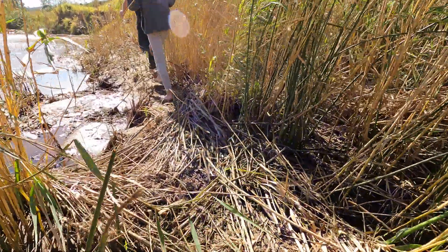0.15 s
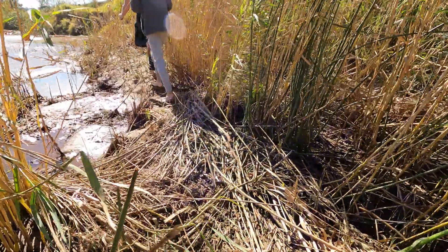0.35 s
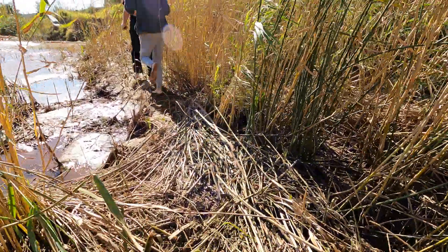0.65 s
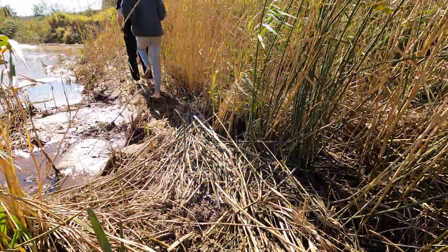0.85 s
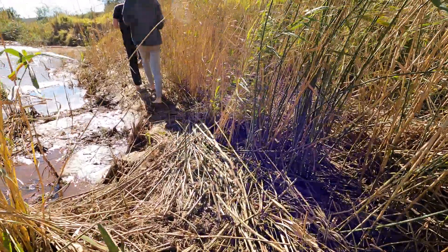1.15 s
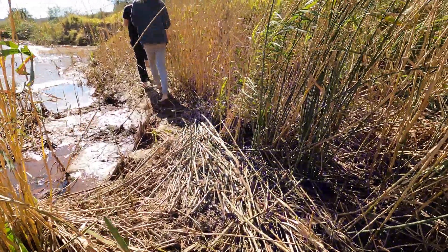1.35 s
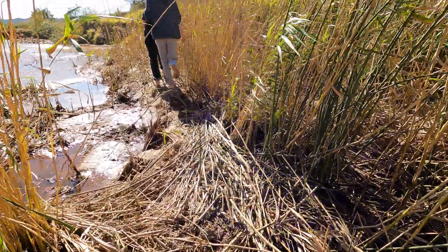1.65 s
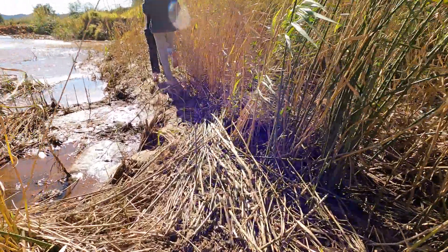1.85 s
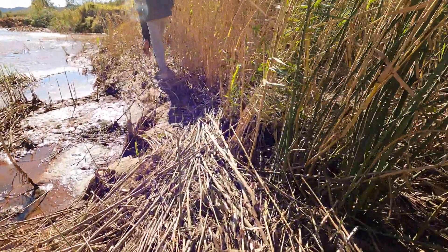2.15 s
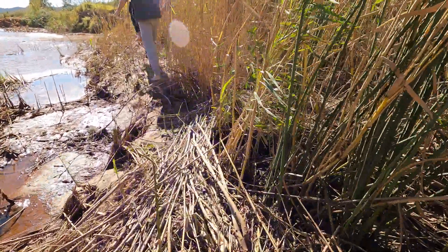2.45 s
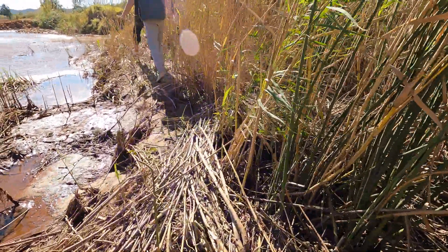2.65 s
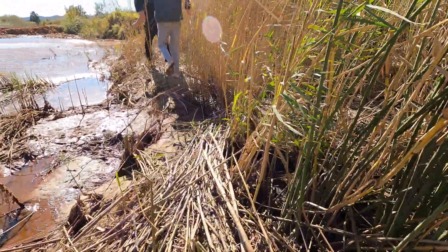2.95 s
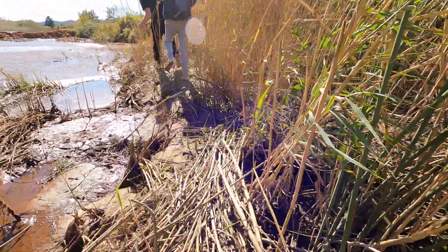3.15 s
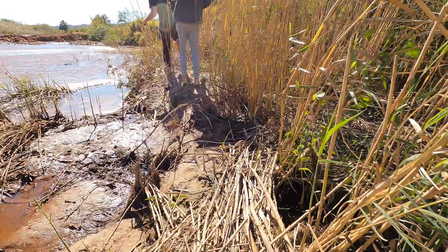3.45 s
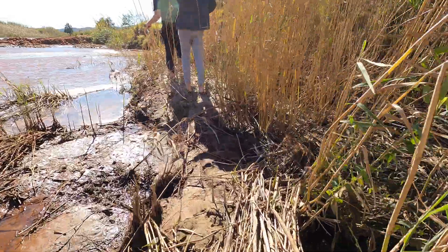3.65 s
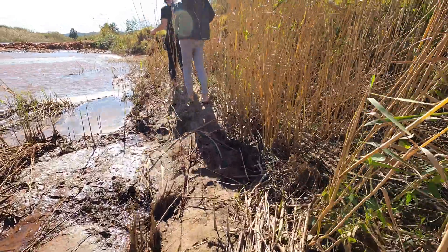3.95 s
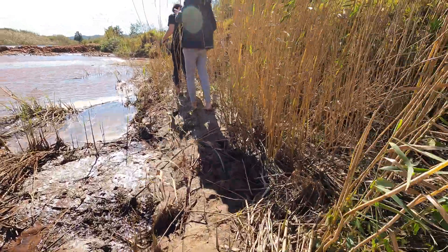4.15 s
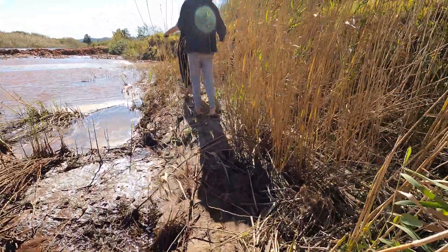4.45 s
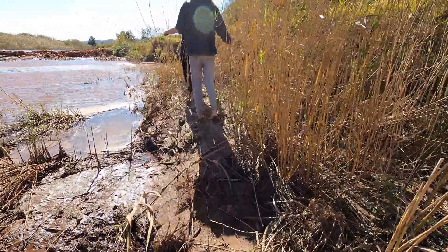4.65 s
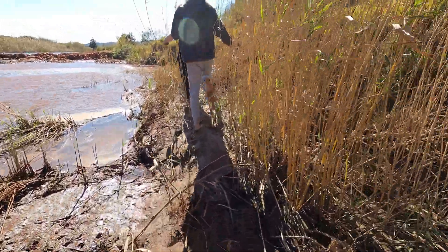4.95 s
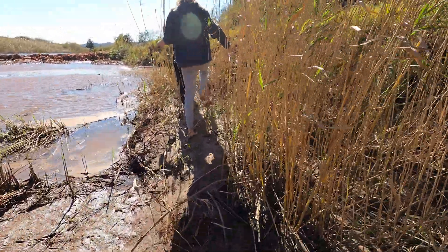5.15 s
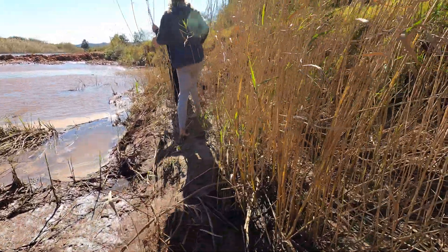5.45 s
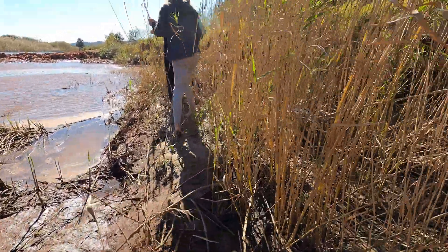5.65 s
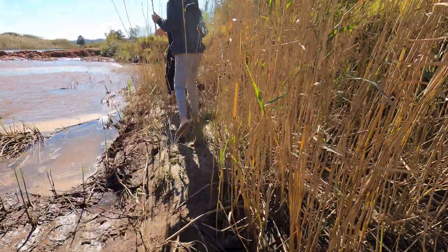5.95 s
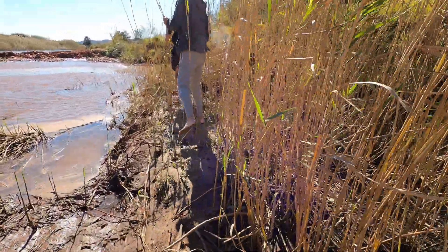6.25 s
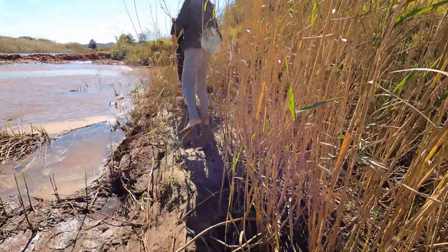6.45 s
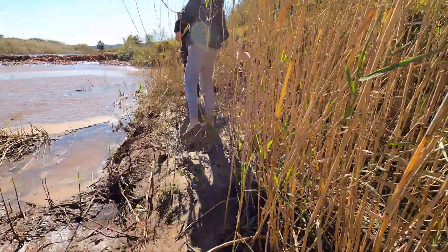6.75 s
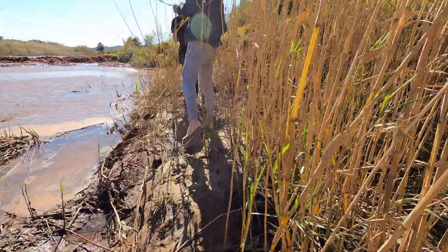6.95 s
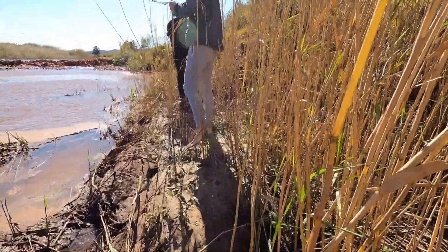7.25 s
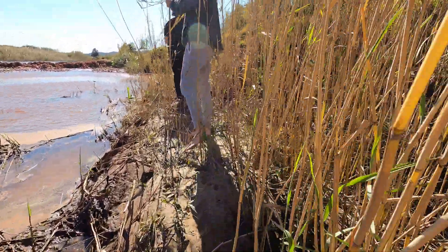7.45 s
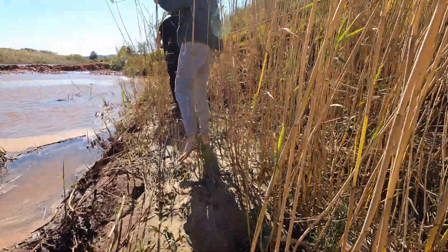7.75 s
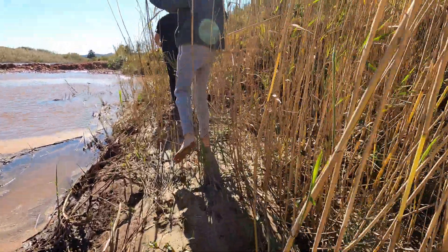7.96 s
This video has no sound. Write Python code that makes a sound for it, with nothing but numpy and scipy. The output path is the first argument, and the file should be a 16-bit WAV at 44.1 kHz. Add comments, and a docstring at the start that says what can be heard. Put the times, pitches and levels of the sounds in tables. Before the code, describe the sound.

Outdoors on a riverbank, close in stereo, walkers push through dry reeds. From 0 s the rustle is full and crisp, thousands of fine leafy ticks over a hiss, with rapid bright stem snaps and faint dull footfalls. It turns softer and duller after 1 s, nearly dropping away at 1.2-1.5 s. Brushing returns at 1.7 s, with a hard crack at 2.3 s among crunching stems and further sharp snaps near 2.9 s. Around 3.1-3.4 s it is sparse and muffled, then a dense crackling burst comes at 3.9-4.2 s. It thins from 4.4 to 5.2 s with isolated ticks. At 5.5 s a very sharp crack opens the loudest stretch, heavy rustling and many breaking stems until 6.1 s. The busy opening rustle and snaps then return, fading toward quiet by 7.4 s and rising again near 8 s. Faint low wind and water hum underneath.

```python
"""A riverbank thick with dry reeds, heard close as walkers push through.
Leaves rustle as thousands of tiny noise ticks over a hiss, with short scrapes where stalks touch.
Stems snap as band-passed jerks with a splintering tail; feet thud as a dull knock and a ringing sine.
Wind and river hum low behind them, as drifting bands of noise.
One microphone is spread to two channels; the passage of about six seconds plays round again."""
import sys
import numpy as np
from scipy import signal
from scipy.io import wavfile
from scipy.ndimage import uniform_filter1d

SR = 44100
rng = np.random.default_rng(int(sys.argv[2]) if len(sys.argv) > 2 else 0)


def master_out(mix):
    """Clip the mix to full scale and print it as 16-bit PCM to the path in sys.argv[1]."""
    frames = np.transpose(np.atleast_2d(mix))
    ceiling = np.clip(frames, -1, 1)
    pcm = np.round(ceiling * 32767).astype(np.int16)
    wavfile.write(sys.argv[1], SR, pcm)


N = 356769
PASSAGE = 270751   # samples until the passage starts over

# bodies pushing through the reeds, a curve: time_s, push_db (before the leaf and crackle gains),
# treble_db (lift or cut, in full from 12 kHz)
BRUSHING = [(0.0, -31, 0.5), (0.13, -32.5, 3), (0.33, -42.5, -0.5), (0.53, -40.5, -1.5), (0.71, -40, -1),
            (0.86, -36, -3), (0.98, -44, -6), (1.08, -40, -10), (1.16, -43, -11), (1.21, -52, -6),
            (1.44, -58, -5), (1.53, -47, -3), (1.62, -44.5, -0.5), (1.74, -36, -3.5), (1.92, -36.5, 2),
            (2.08, -33.5, -3.5), (2.26, -36.5, -2), (2.5, -42, -0.5), (3.11, -44.5, -9), (3.41, -37.5, -12),
            (3.85, -33.5, 0), (4.2, -35, 1), (4.28, -41.5, -2), (4.59, -49, 2), (4.76, -39.5, 1),
            (5.14, -41.5, -6.5), (5.25, -36, -7.5), (5.53, -32.5, -4.5), (5.73, -28.5, -0.5),
            (6.14, -33.5, 2.5)]
# bunches of stems crushed at once, each a brief swell of the rustle: peak_time_s, push_db
CRUNCHES = [(0.49, -37.5), (2.30, -36), (2.416, -33), (2.58, -38.5), (2.65, -42), (2.79, -44), (2.87, -44),
            (3.0, -44), (3.4, -38.5), (3.9, -35), (4.13, -33), (4.41, -50), (4.87, -48), (5.58, -32),
            (5.96, -32), (6.09, -28)]
CRUNCH_RISE_S, CRUNCH_FALL_S = 0.013, 0.02
# colour of the rustling leaves: frequency_hz, relative_db (per Hz)
LEAF_SPECTRUM = [(240, -48), (400, -19), (432, -18.5), (579, -14), (1190, -5.5), (1520, -8), (1780, -4.5),
                 (2170, -1.5), (4690, 0), (12000, -6.5), (15800, -8.5)]
MEDIAN_TICKS_PER_S, TICK_SIZE_SPREAD_DB = 9000, 4
# separate stalk contacts: median rate, level against the push level
MEDIAN_CRACKLES_PER_S, CRACKLE_DB = 450, -9
# stems snapping: start_s, crack_peak_db, pitch_hz
STEM_SNAPS = [(0.0197, -10, 5800), (0.0956, -11.5, 7460), (0.1718, -14, 6700), (0.254, -16, 7380),
              (0.397, -32, 2500), (0.447, -22, 5500), (0.4805, -26, 8000), (0.494, -17, 5400),
              (0.6446, -21, 5450), (0.6653, -13, 5440), (0.8215, -17, 4500), (0.8253, -18, 5110),
              (0.8544, -12, 4980), (0.8865, -24, 6000), (0.915, -25, 6500), (0.926, -18, 5580),
              (0.9313, -18.5, 5630), (0.9454, -17, 5200), (1.037, -19, 4330), (1.4976, -26, 7500),
              (1.6237, -14.5, 5470), (1.629, -19, 4500), (1.632, -26, 2960), (1.658, -26, 5000),
              (1.6948, -13.5, 6010), (1.7314, -17, 3200), (1.7682, -17.5, 4580), (1.8647, -17, 4800),
              (2.296, -9.5, 6030), (2.3021, -1.5, 5170), (2.3955, -8.5, 5260), (2.419, -20, 5670),
              (2.5262, -18, 5340), (2.5682, -18.5, 5000), (2.6457, -18, 4600), (2.7165, -14, 4060),
              (2.7637, -17, 5100), (2.787, -22, 3500), (2.8111, -10, 6000), (2.8619, -14, 4970),
              (2.8705, -7, 3970), (2.8802, -3, 5800), (2.947, -26, 5730), (3.0555, -15, 4800),
              (3.07, -28, 7000), (3.5355, -13, 6200), (3.6288, -18, 8700), (3.8868, -9, 5280),
              (3.895, -15, 5730), (3.9115, -13, 6200), (3.9167, -7, 2110), (3.9185, -15.5, 1470),
              (3.9654, -13, 5020), (3.9798, -11, 5970), (4.0428, -14, 7000), (4.0744, -22, 5720),
              (4.089, -8, 6670), (4.1164, -11, 3380), (4.1337, -15, 4660), (4.1824, -7, 5700),
              (4.2418, -20, 4960), (4.3738, -24, 9000), (4.3945, -29, 9000), (4.4067, -17.5, 6960),
              (4.481, -9, 8600), (4.6434, -24, 10080), (4.6907, -24, 4000), (4.8379, -24, 2800),
              (4.867, -22, 8000), (4.8755, -27, 6000), (5.0845, -18.5, 5370), (5.089, -27, 4640),
              (5.2591, -18, 5700), (5.5465, 0.5, 9300), (5.5473, -9.5, 3480), (5.5521, -17, 9000),
              (5.6193, -5, 4740), (5.7141, -8, 6200), (5.7429, -0.5, 5440), (5.7615, -10, 4500),
              (5.7978, -20, 5810), (5.8046, -6, 7400), (5.8875, -9, 6170), (5.893, -12, 5280),
              (5.9067, -18, 5410), (5.9418, -14, 5090), (5.9571, -11.5, 3430), (5.9616, -6.5, 4030),
              (6.014, -3, 5100), (6.0655, -7.5, 6000), (6.0927, -8, 5440)]
# width of a crack at 5 kHz, and how much wider it gets with each octave: thinner, higher stems crack wider
SNAP_OCTAVES, WIDER_PER_OCTAVE = 1.27, 0.48
# splinter tail at its start behind a 0 dB crack; share of the crack's level that it follows
SPLINTER_DB, SPLINTER_FOLLOWS = -21, 0.54
# feet on the soft ground: start_s, knock_peak_db, boom_db (before its rise, decay and filter)
FOOTFALLS = [(0.033, -53, -43), (0.349, -53, -45), (0.44, -44, -48), (0.529, -48, -44), (0.781, -59.5, -58),
             (1.585, -42.5, -45.5), (1.629, -39, -64), (1.82, -43.5, -52), (1.979, -37.5, -40.5),
             (2.303, -41, -40.5)]
# ring of the soft ground: pitch_hz, t60_s
GROUND_RING = (141, 0.086)
# lowest rumble of the wind, a curve: time_s, level_db (before its slow drift)
WIND_RUMBLE = [(0.0, -70), (0.75, -73.5), (1.4, -79), (2.2, -75), (3.0, -79), (4.3, -78), (4.85, -83),
               (5.1, -89), (5.55, -65), (6.14, -67)]
# colour of the low hum: frequency_hz, relative_db (per Hz, weights for equal-ratio bands)
HUM_SPECTRUM = [(53, -40), (90, -13.5), (146, -1.5), (195, -1), (373, 0), (431, -9.5), (575, 2),
                (845, -13.5), (1110, -2), (1600, -14), (2080, -32), (3520, -120)]
# low hum at the mean rumble level; share of the rumble's swing that it follows
HUM_DB, HUM_FOLLOWS = -59, 0.053
DRONE_HZ, DRONE_WIDTH_HZ, DRONE_DB = 138, 37, -73   # a faint steady drone within the hum
# narrow dips in the tone of the whole sound: frequency_hz, width_hz, depth (0-1)
TONE_DIPS = [(436, 25, 0.98), (1772, 280, 0.67)]
CEILING = 1.1   # peaks are rounded off below this height
CUTOFF_HZ = 15750


def rustle():
    """Leaves tick in clumps over their own hiss; each tick sounds in a wide band of its own size."""
    push_db, treble_db = pushing()
    clump = drift(30)
    born = rng.random(PASSAGE) < MEDIAN_TICKS_PER_S * from_db(3.0 * clump) / SR
    sizes = from_db(TICK_SIZE_SPREAD_DB * np.minimum(rng.exponential(1, PASSAGE), 5.5))
    ticks = born * sizes * rng.choice([-1, 1], PASSAGE)
    # even out the local loudness, so that coarseness leaves it alone
    ticks = ticks / np.sqrt(uniform_filter1d(ticks ** 2, size=9000) + 1e-9)
    size_class = rng.uniform(-2, 13, PASSAGE)
    hiss = rng.standard_normal((2, PASSAGE))
    total = 0
    for k, hz in enumerate(420 * 2 ** np.arange(0, 5.6, .5)):
        reached = np.abs(size_class - k) < 2.5   # a tick spans about two octaves
        voice = rms_one(ticks * reached) + 0.75 * hiss[k % 2]
        voice = band(voice, hz / 2 ** 0.28, hz * 2 ** 0.3)
        voice = rms_one(voice) * np.sqrt(hz)   # per-Hz level to band level
        # fine leaves near the microphone lift the treble
        tilt_db = np.clip(np.log2(hz / 6000), 0, 1) * treble_db
        color_db = at_hz(LEAF_SPECTRUM, min(hz, 16000))
        total = total + voice * from_db(color_db + tilt_db + 1.0 * drift(29))
    leaves = rms_one(total) * from_db(0.33 * clump)
    return from_db(push_db) * (from_db(1.15) * leaves + from_db(CRACKLE_DB) * crackles())


def pushing():
    """Push level and treble of the rustle: brushing plus quick crunches, added as power."""
    brush_db, treble_db = in_time(BRUSHING)
    power = from_db(2 * brush_db)
    t = np.arange(PASSAGE) / SR
    for peak_s, db in CRUNCHES:
        distance = np.where(t < peak_s, (peak_s - t) / CRUNCH_RISE_S, (t - peak_s) / CRUNCH_FALL_S)
        power = power + from_db(2 * db) * np.exp(-distance ** 2)
    return 10 * np.log10(power), treble_db


def crackles():
    """Scattered stalk contacts, each a scrape of a millisecond or two in one of eight bands; rms 1."""
    born = rng.random(PASSAGE) < MEDIAN_CRACKLES_PER_S * from_db(5.0 * drift(15)) / SR
    sizes = from_db(3.2 * np.minimum(rng.exponential(1, PASSAGE), 3.5))
    stalk = rng.integers(0, 8, PASSAGE)
    grit = rng.standard_normal(PASSAGE)
    fade = [1, -np.exp(-1 / (0.00084 * SR))]   # decay time 0.84 ms
    total = 0
    for k, hz in enumerate(np.geomspace(2000, 9000, 8)):
        envelope = signal.lfilter([1], fade, born * sizes * (stalk == k) + 1e-18)
        total = total + band(grit * envelope, hz / 1.49, hz * 1.27)
    return rms_one(total)


def snaps():
    """A crack of two or three cycles, then fibres splintering for a few milliseconds."""
    length = 900
    out, t = np.zeros(PASSAGE + length), np.arange(length) / SR
    shape = (len(STEM_SNAPS), length)
    fibres = rng.standard_normal(shape) * rng.exponential(1, shape)
    for (start_s, peak_db, hz), fibre in zip(STEM_SNAPS, fibres):
        octaves = SNAP_OCTAVES + WIDER_PER_OCTAVE * np.log2(hz / 5000)
        reach = min(2 ** (octaves / 2), 16000 / hz)   # ratio from the pitch to either band edge
        # the stem gives way in a few quick jerks
        split = (t == 0) + 0.5001 * fibre * np.exp(-t / 0.0002)
        crack = band(split, hz / reach, hz * reach) + 0.11 * band(split, hz * reach, 17300)
        crack = from_db(peak_db) * crack / np.abs(crack).max()
        tail = rms_one(band(fibre, hz / reach / 1.92, hz * reach * 0.88)) * np.exp(-t / 0.0025)
        tail = from_db(SPLINTER_DB + SPLINTER_FOLLOWS * peak_db) * tail
        i = round(start_s * SR)
        out[i:i + length] += crack + tail
    return out[:PASSAGE]


def thuds():
    """A dull wide knock of the sole, and the ground booming briefly under it as a decaying sine."""
    length = 4000
    out, t = np.zeros(PASSAGE + length), np.arange(length) / SR
    knock = band(band((t == 0) * 1., 144, 690), 74, 720)
    ring_hz, t60_s = GROUND_RING
    boom = np.sin(2 * np.pi * ring_hz * t) * from_db(-60 * t / t60_s)
    boom = boom * (1 - np.exp(-t / 0.0015))   # soft onset
    boom = band(boom, 90, 400)
    for start_s, knock_db, boom_db in FOOTFALLS:
        i = round(start_s * SR)
        out[i:i + length] += from_db(knock_db) * knock / knock.max() + from_db(boom_db) * boom
    return out[:PASSAGE]


def air():
    """Lumpy low noise of wind and water: drifting hum bands, a lowest rumble and a faint drone."""
    rumble_db, = in_time(WIND_RUMBLE)
    white = rng.standard_normal((2, PASSAGE))
    hum = 0
    for k, hz in enumerate(95 * 2 ** np.arange(0, 4.2, 1 / 3)):
        voice = band(white[k % 2], hz / 2 ** 0.18, hz * 2 ** 0.095)
        hum = hum + voice * from_db(at_hz(HUM_SPECTRUM, hz) + 1.34 * drift(20))
    drone = band(white[0], DRONE_HZ - DRONE_WIDTH_HZ / 2, DRONE_HZ + DRONE_WIDTH_HZ / 2)
    drone = from_db(DRONE_DB) * rms_one(drone)
    rumble = rms_one(band(white[1], 62, 126)) * from_db(rumble_db + 2.8 * drift(1.2))
    hum_db = HUM_DB + HUM_FOLLOWS * (rumble_db - rumble_db.mean())
    return from_db(hum_db) * rms_one(hum) + rumble + drone


def from_db(db):
    """Decibels to amplitude gain."""
    return 10 ** (np.asarray(db) / 20)


def rms_one(x):
    """Scale to rms 1."""
    return x / np.sqrt(np.mean(x ** 2) + 1e-20)


def in_time(rows):
    """Columns of a curve, one value a sample."""
    time_s, *columns = np.transpose(rows)
    return [np.interp(np.arange(PASSAGE) / SR, time_s, column) for column in columns]


def at_hz(points, hz):
    """Read a spectrum on a log-frequency axis."""
    point_hz, point_db = np.array(points).T
    return np.interp(np.log(hz), np.log(point_hz), point_db)


def drift(rate_hz):
    """Slow random wander of spread 1: noise through two equal poles, made at a 20th of the rate."""
    pole = np.exp(-40 * np.pi * rate_hz / SR)
    noise = rng.standard_normal(PASSAGE // 20 + 2002)
    slow = signal.lfilter([1], [1, -2 * pole, pole * pole], noise)[2000:]   # drop the filter's start
    return np.interp(np.arange(PASSAGE) / 20, np.arange(len(slow)), rms_one(slow))


def band(x, low_hz, high_hz):
    """Causal band-pass."""
    edges_hz = [low_hz, min(high_hz, .45 * SR)]
    return signal.sosfilt(signal.butter(2, edges_hz, "band", fs=SR, output="sos"), x)


def scene():
    """One passage through the reeds, played on in a loop."""
    once = rustle() + snaps() + thuds() + air()
    return np.tile(np.resize(once, N), (2, 1))


def record(dry):
    """One channel with narrow tone dips and rounded peaks, widened by a late copy of opposite signs."""
    mid = dry.mean(axis=0)
    for hz, width_hz, depth in TONE_DIPS:
        peak = signal.lfilter(*signal.iirpeak(hz, hz / width_hz, fs=SR), mid)
        mid = mid - np.clip(depth, 0, 1) * peak
    # a gentle low-pass softens the highest treble
    mid = signal.sosfilt(signal.butter(4, 15000, fs=SR, output="sos"), mid)
    mid = CEILING * np.tanh(mid / CEILING)
    late = np.r_[np.zeros(41), mid[:-41]]   # just under a millisecond
    late = signal.sosfilt(signal.butter(2, 155, "high", fs=SR, output="sos"), late)
    side = .38 * signal.sosfilt(signal.butter(2, 1450, fs=SR, output="sos"), late)
    top_cut = signal.ellip(12, .3, 70, CUTOFF_HZ, fs=SR, output="sos")
    return signal.sosfilt(top_cut, [mid + side, mid - side])


dry = scene()
out = record(dry)
master_out(out)
```